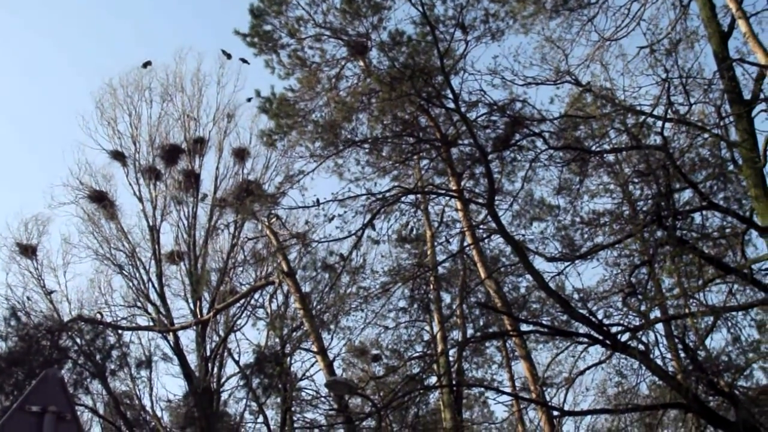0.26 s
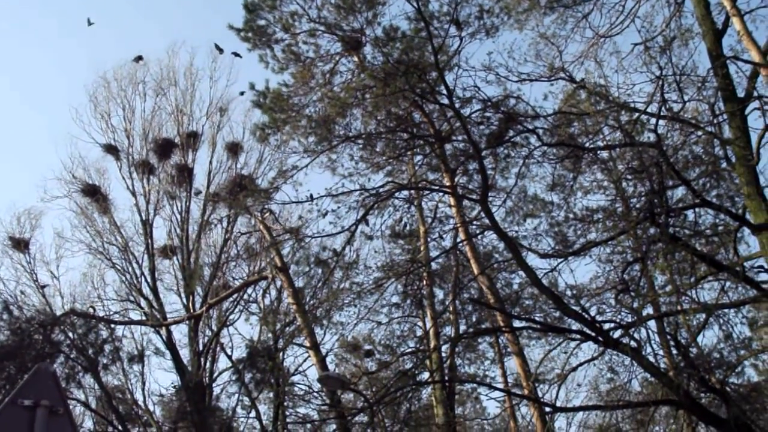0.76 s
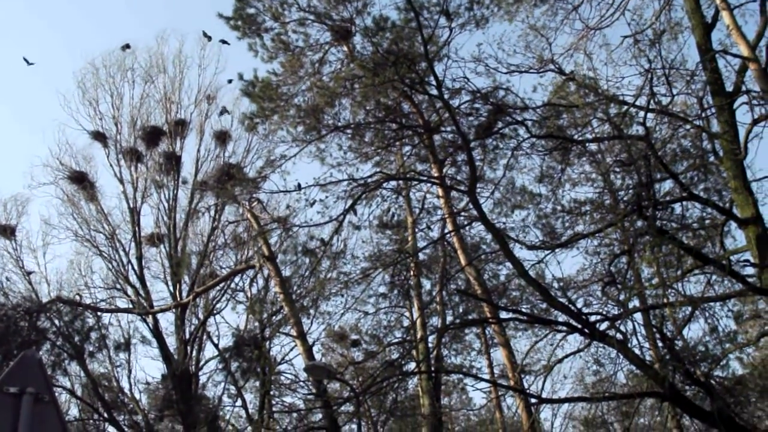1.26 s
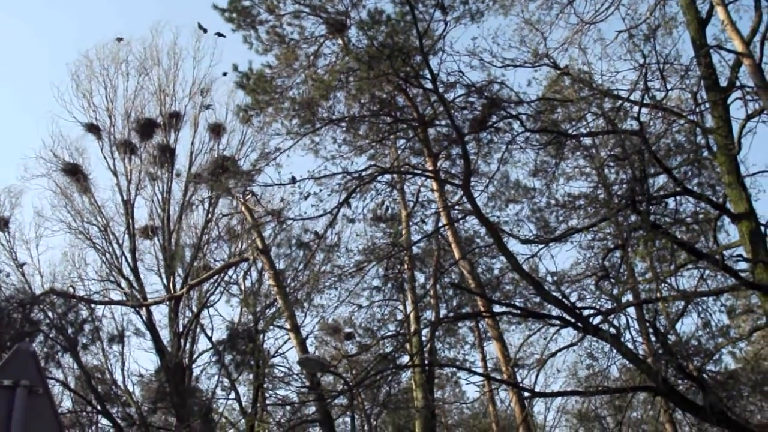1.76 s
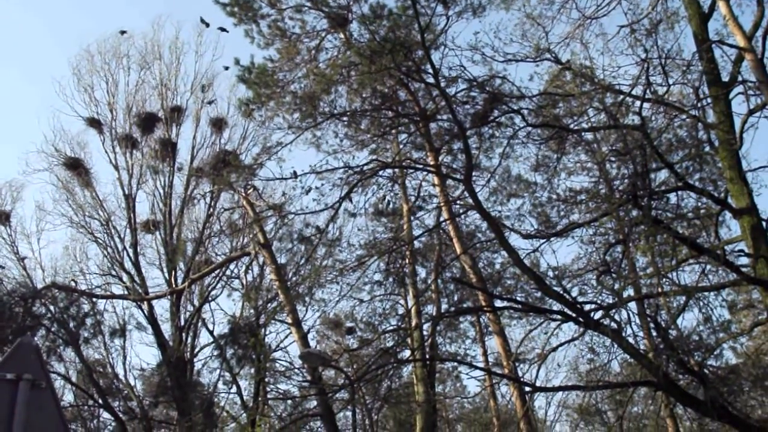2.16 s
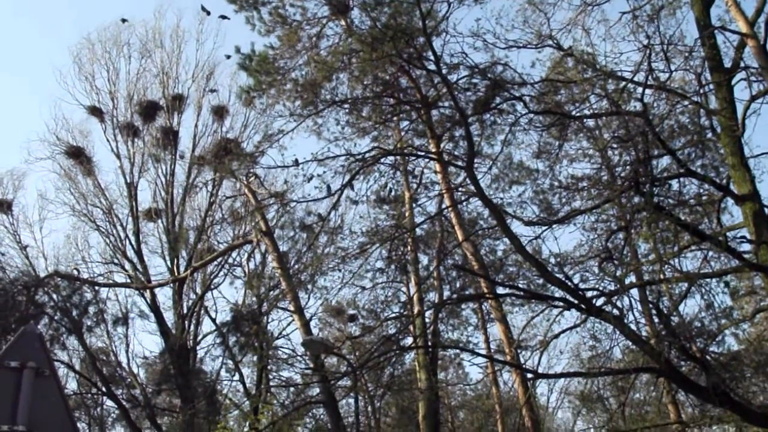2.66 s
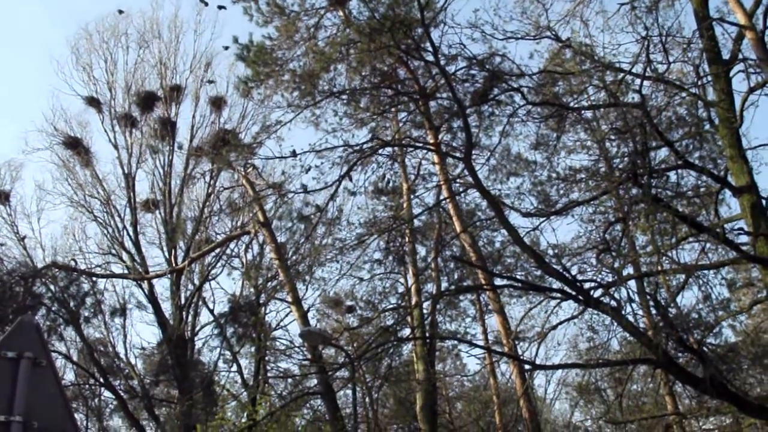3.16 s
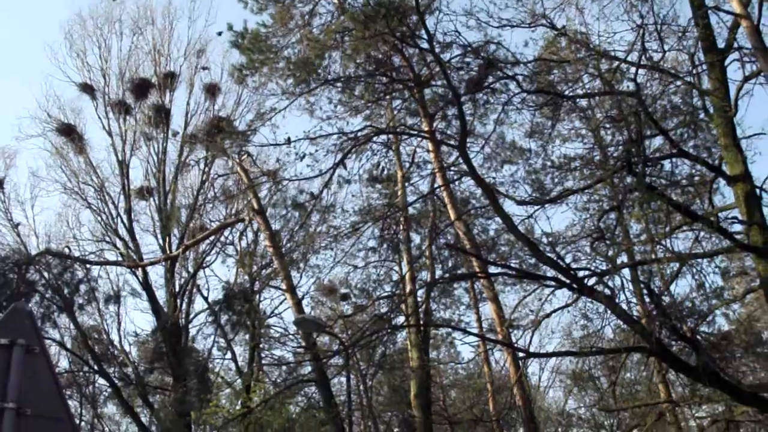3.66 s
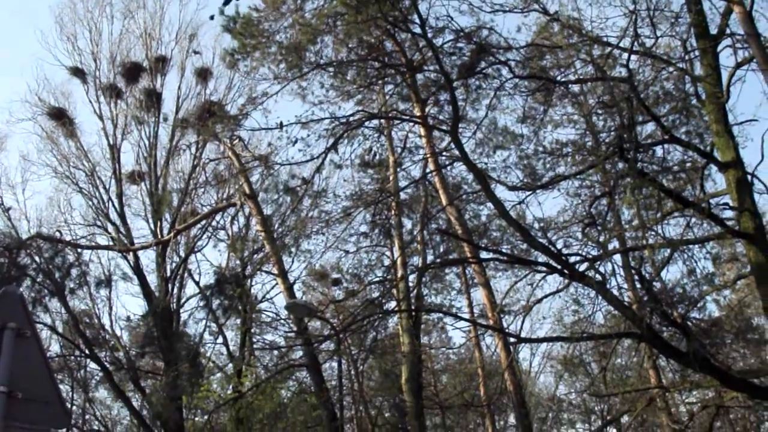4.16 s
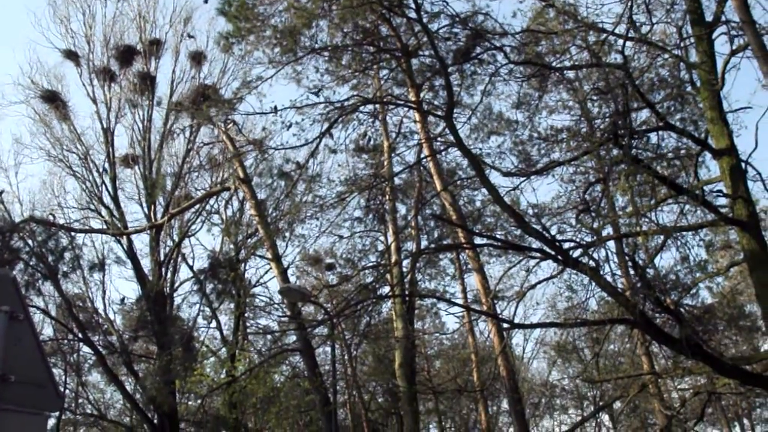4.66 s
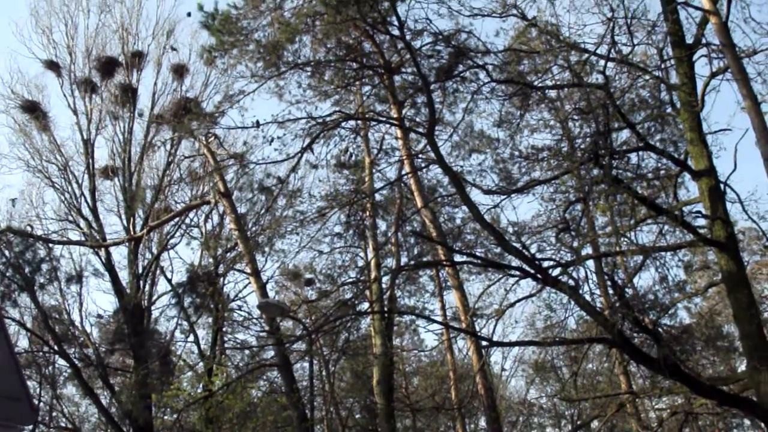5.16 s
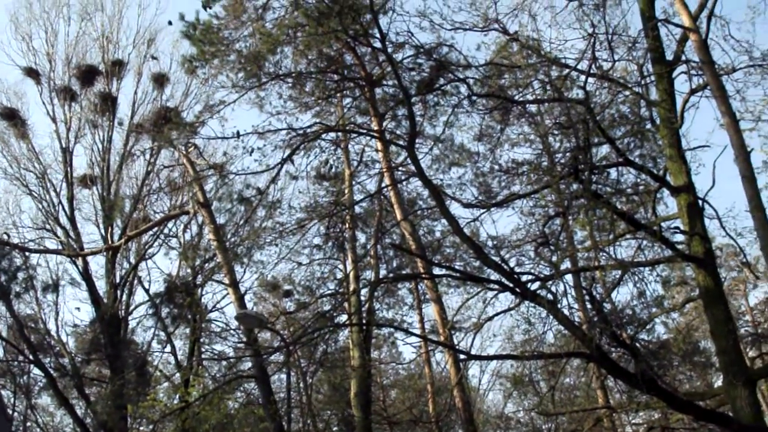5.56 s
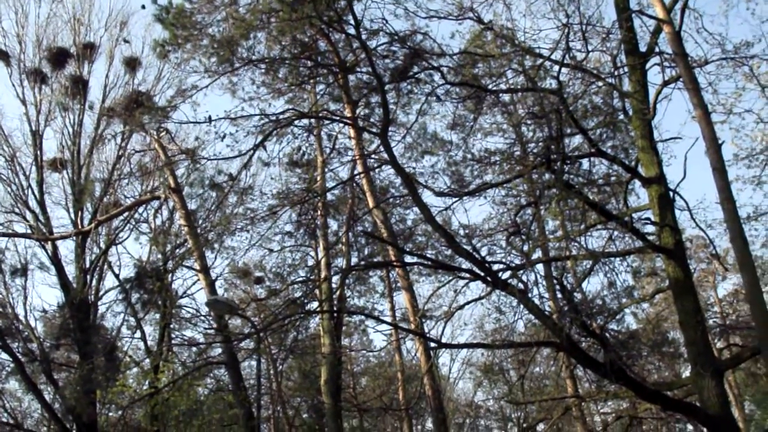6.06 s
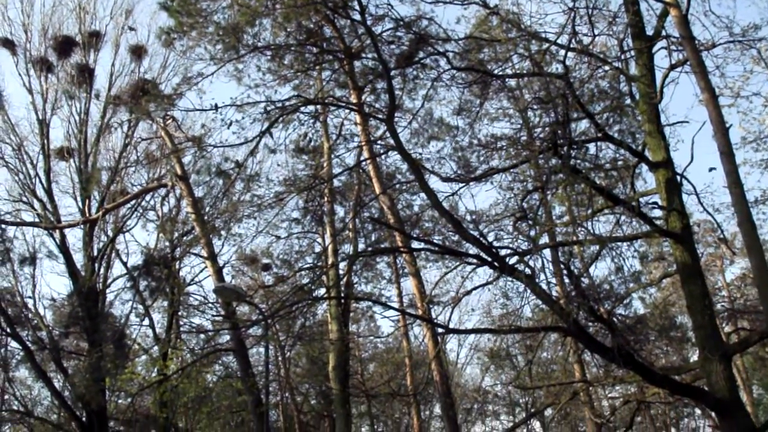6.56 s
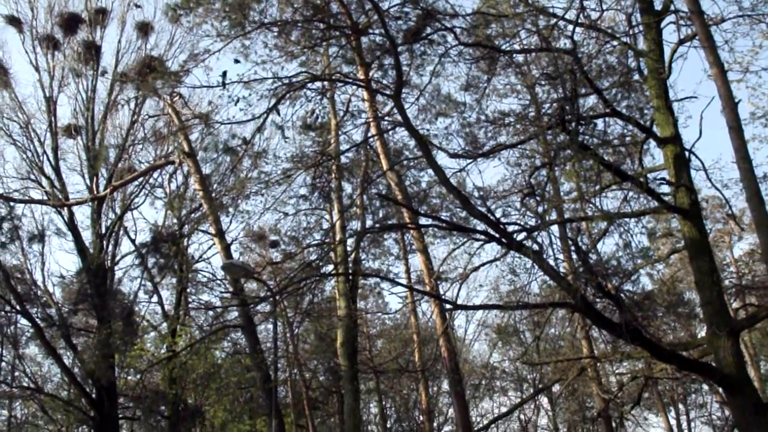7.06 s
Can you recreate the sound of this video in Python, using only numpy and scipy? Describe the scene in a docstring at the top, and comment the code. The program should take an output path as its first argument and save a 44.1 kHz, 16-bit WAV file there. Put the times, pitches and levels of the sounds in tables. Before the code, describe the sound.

Outdoors in a wood, a continuous crowd of rooks calls from treetop nests. Rough nearer caws open the scene, then high yelps come at regular intervals around the middle, joined by long nasal calls turning hoarse, and return near the end with a burst of close caws. Deep wind buffets the microphone early, eases in the middle and comes back lightly. Soft woodland hush, camera hiss and thin high whine lie underneath.

```python
"""Dozens of rooks caw over each other in the treetops of a wood; a few nearer ones stand out, a few calls
ring clear, and one bird repeats a short high yelp. Each call is a pulse train through throat and beak
resonances, scattered by trunks. Wind buffets the microphone of a small camera as shaped noise in gusts;
faint high lisps and the hush of the wood are filtered noise. The camera adds hiss and a thin whine."""
import sys
import numpy as np
from scipy import signal
from scipy.fft import rfft, irfft, next_fast_len
from scipy.io import wavfile
from scipy.ndimage import uniform_filter1d, minimum_filter1d

SR = 44100
rng = np.random.default_rng(int(sys.argv[2]) if len(sys.argv) > 2 else 0)


def to_wav(s):
    """Save 16-bit WAV."""
    ch = np.atleast_2d(s).T  # columns
    pcm = np.round(np.clip(ch, -1, 1) * 32767)  # PCM
    wavfile.write(sys.argv[1], SR, pcm.astype(np.int16))


N = 322812
T = np.arange(N) / SR
TOP_HZ = 11050  # upper band limit of pulses and camera
WHOLE_S = N / SR

# Resonances of a caw, the last one from the open beak. Each row: centre in Hz, width in Hz, gain in dB.
THROAT = [(354, 410, -10), (1303, 293, 4), (1680, 656, 2.5), (2920, 425, 7)]
# Overtones above the beak resonance: centre in Hz, width in Hz, gain in dB.
RASP = (6740, 1400, -27.5)


def colony(count=60):
    """Far rooks call in loose succession, each with its own pitch and throat size; beak level varies apart."""
    # Whole colony. Each row: time in s, throat level in dB before trim, beak against throat in dB before trim.
    colony_levels = [(0, -20, 1.5), (.6, -17, 3.5), (.8, -17, -1.5), (1.55, -17.5, -2), (2.25, -17, -3.5),
                     (2.8, -19.5, -2), (3.0, -19, -4.5), (3.55, -19.5, -7), (4.15, -22.5, 5),
                     (4.38, -23, -4.5), (4.92, -28, -5.5), (5.14, -18.5, -4), (5.5, -22, -4.5),
                     (5.72, -24.5, 1.5), (5.97, -19.5, -1), (6.38, -21.5, -2.5), (7.0, -18.5, -0.5),
                     (7.32, -23, 4)]
    trim_db, beak_trim_db = -0.5, -7
    throats, beaks = np.zeros(N), np.zeros(N)
    traits = rng.uniform(-1, 1, (count, 6))
    for k, (when, span, pitch, build, near, harsh) in enumerate(traits):
        length_s = .31 + .1 * span
        hz = 230 * 2 ** (.35 * pitch)
        rough = 0.655 + 0.3376 * harsh
        call = syrinx(length_s, hz, .14, rough) * undb(3.2 * near)
        start_s = (k + when) / count * (WHOLE_S + .3) - .3
        modes = [(f * (1 + 0.0096 * build), width, db) for f, width, db in THROAT]
        for out, part in ((throats, modes[:-1]), (beaks, [modes[-1], RASP])):
            voice = gape(resonate(call, part))
            add(out, trunks(voice, t60=.7, wet_db=4), start_s)
    throat_db, beak_db = curves(colony_levels)
    mix = even(throats, 0.2) + undb(beak_db + beak_trim_db) * even(beaks, 0.12)
    return undb(throat_db + trim_db) * mix


def near_rooks():
    """Harsh caws from the closest nests; a wider beak lifts the upper resonances."""
    # Each row: start in s, length in s, pitch at crest in Hz (before gape and shake),
    # level in dB before echoes and colour, beak lift in dB, roughness 0-1.
    caws = [(-.08, 0.33, 199.2, -23, 30, 0.99), (0.101, 0.37, 221, -25, 14, 0.67),
            (0.381, .25, 256, -16.5, 10, 0.76), (0.541, 0.19, 245, -20.5, -5, 0.85),
            (1.241, 0.22, 251, -17, 7, 0.74), (1.463, 0.34, 200, -26, 16, 0.49),
            (1.951, 0.41, 201.4, -24.5, -9.5, 0.78), (2.104, .19, 263.5, -19, 9, 0.91),
            (2.902, 0.35, 216.9, -22, -10.5, 0.35), (2.913, 0.18, 271, -21.5, 18, 0.76),
            (3.943, 0.4, 218.2, -22, -7, 0.34), (4.056, 0.2, 260.7, -24, 21, 0.75),
            (5.511, 0.18, 213, -29.5, -30, 0.19), (5.771, 0.25, 245.3, -25, -11, 0.72),
            (6.623, 0.29, 231.2, -23.5, 24, 0.83), (6.928, 0.27, 266.8, -18, 25, 0.7),
            (7.088, 0.24, 246.3, -18.5, 27, 0.77)]
    out = np.zeros(N)
    for start_s, length_s, hz, db, beak_db, rough in caws:
        lifts_db = (0, 0, 1.33 * (beak_db - 4), beak_db, beak_db)
        modes = [(f, width, gain + lift) for (f, width, gain), lift in zip(THROAT + [RASP], lifts_db)]
        pulses = syrinx(length_s, hz, .14, rough, crest=.3, attack=0.019, release=0.098)
        call = level(gape(resonate(pulses, modes), share=.07), db)
        add(out, trunks(call, t60=.45, wet_db=5), start_s)
    return out


def clear_calls():
    """Long nasal calls whose single overtones ring out; they turn hoarse towards the end."""
    # Each row: start in s, length in s, pitch at crest in Hz (before shake), level in dB before echoes
    # and colour, pitch arch share, weakening of every second pulse 0-1, resonance scale.
    clear = [(0.117, 0.26, 443.6, -21, 0.039, 0.6, 0.98), (3.678, 0.43, 461, -17.5, 0.1, 0.4, 1.085),
             (3.95, 0.3, 426, -25.5, 0.26, 0.4, 0.6), (4.425, .43, 455, -24.5, 0.16, 0.72, 1.12),
             (5.503, 0.61, 416, -33, .04, 0, 1.45)]
    # Resonances before scaling. Each row: centre in Hz, width in Hz, gain in dB.
    clear_throat = [(1350, 320, -5), (2090, 530, 25.5), (2780, 520, -8.5), (6800, 1400, -24)]
    out = np.zeros(N)
    for start_s, length_s, hz, db, arch, weak, scale in clear:
        shape = dict(crest=.34, attack=.05, release=.04)
        pure = syrinx(length_s, hz, arch, .07, weak, **shape)
        hoarse = syrinx(length_s, hz, arch, .4, weak, **shape)
        share = np.linspace(.2, .75, len(pure)) ** 2  # power share of the hoarse voice
        voice = np.sqrt(1 - share) * pure + np.sqrt(share) * hoarse
        modes = [(f * scale, width, gain) for f, width, gain in clear_throat]
        call = level(resonate(voice, modes), db)
        add(out, trunks(call, t60=.4, wet_db=-5.5), start_s)
    return out


def yelps():
    """A high, cracked voice leaps up and down; its fourth harmonic sweeps through the beak resonance twice."""
    # All of one shape. Each row: start in s, level in dB before echoes and colour.
    yelp_times = [(2.409, -27), (2.81, -24.5), (3.211, -24), (3.621, -23.5), (4.07, -24), (6.53, -23.5),
                  (6.924, -26.5)]
    # Each row: centre in Hz, width in Hz, gain in dB.
    yelp_throat = [(1750, 800, 2.5), (2770, 400, -31), (3250, 250, 13.5)]
    length_s, hz, arch, rough = .188, 936.5, .19, 0.463
    out = np.zeros(N)
    for start_s, db in yelp_times:
        pulses = syrinx(length_s, hz, arch, rough, crest=.5, attack=.025, release=.015)
        call = level(resonate(pulses, yelp_throat), db)
        add(out, trunks(call, t60=.25, wet_db=-4), start_s)
    return out


def syrinx(length, hz, arch, rough, weak=0, crest=.4, attack=0.038, release=0.046):
    """One call as a pulse train: pitch rises and sags; roughness shakes the cycles and adds gated air."""
    size = int(length * SR)
    t = np.arange(size) / SR
    wander = walk(SR, 44.71)[:size]
    shake = walk(SR, 350)[:size]
    rattle = walk(SR, 107.7)[:size]
    air = rng.standard_normal(SR)[:size]
    u = t / length
    bend = np.where(u < crest, (crest - u) / crest, (u - crest) / (1 - crest)) ** 2
    jitter = 0.00297 * wander + rough * (0.02062 * wander + 0.05925 * shake)
    pitch_hz = hz * (1 - arch * bend) * (1 + jitter)
    phase = np.pi * np.cumsum(pitch_hz) / SR  # half a turn per pulse
    harmonics = int(TOP_HZ / hz)
    pulses = level(np.sin((2 * harmonics + 1) * phase) / (np.sin(phase) + 1e-12) - 1, 0)
    pulses = pulses * (1 - weak * np.sin(phase / 2) ** 2)  # strong and weak pulses alternate
    puffs = level(air * np.cos(phase) ** 4, 0)
    voice = (pulses + 1.25 * rough * puffs) * undb(3.4 * rough * rattle)
    return voice * np.clip(t / attack, 0, 1) * np.clip((length - t) / release, 0, 1)


def gape(call, share=.1):
    """The beak opens and closes during a caw: resonances and pitch rise and sag together."""
    u = np.linspace(-1, 1, len(call))
    speed = 1 - share * (u ** 2 - np.mean(u ** 2))
    return np.interp(np.cumsum(speed), np.arange(len(call)), call)


def trunks(x, t60, wet_db):
    """Direct sound plus its echoes, scaled to keep the power about the same."""
    wet = undb(wet_db) * echoes(x, t60)
    direct = np.pad(x, (0, len(wet) - len(x)))
    return (direct + wet) / np.sqrt(1 + undb(wet_db) ** 2)


def echoes(x, t60):
    """Many small decaying reflections from trunks and branches, drawn anew per call, of unit total energy."""
    t = np.arange(SR // 2) / SR
    chance = rng.standard_normal(len(t))
    decay = np.exp(-np.log(1000) * t / t60)
    response = chance * np.abs(chance) * decay * np.clip(t / 0.0017, 0, 1)
    return signal.fftconvolve(x, response / np.sqrt(np.sum(response ** 2)))


def wind():
    """Small eddies buffet the microphone in gusts; large ones swell and sink more gradually under them."""
    # Small eddies. Each row: frequency in Hz, relative density in dB per Hz.
    wind_colour = [(25, -12.5), (48, 3), (80, -4.5), (120, -14), (180, -23.5), (300, -38.5), (700, -75)]
    # Slow pressure swings. Each row: frequency in Hz, relative density in dB per Hz.
    sway_colour = [(8, 0), (24, 9.5), (42, 5.5), (60, -11), (120, -62.5)]
    sway_db, sway_smooth_s = -0.5, 0.2
    force_db = wind_force()
    smooth_db = uniform_filter1d(force_db, int(sway_smooth_s * SR)) + sway_db
    eddies = even(colour(rng.standard_normal(N), wind_colour), 0.0616) * undb(force_db)
    sway = even(colour(rng.standard_normal(N), sway_colour), 0.26) * undb(smooth_db)
    return eddies + sway


def wind_force():
    """Level of the wind in dB: each gust rises quickly, holds and dies away on top of the breeze."""
    # Breeze between gusts. Each row: time in s, level in dB before trim.
    breeze = [(0.0, -28), (0.41, -28.5), (1.12, -19), (1.65, -21), (2.53, -29.5), (4.36, -36.5),
              (5.02, -26.5), (6.48, -28), (6.71, -26.5), (7.32, -24.5)]
    # Gusts that hit the microphone. Each row: start in s, time to the decay in s, level in dB.
    gusts = [(-.01, 0.036, -16), (0.11, 0.094, -14), (0.495, 0.081, -20), (0.767, 0.11, -14),
             (1.074, 0.12, -11), (1.213, 0.073, -13), (1.386, 0.045, -8), (1.579, 0.21, -17.5),
             (2.05, 0.11, -14.5), (2.941, 0.027, -19), (4.508, 0.066, -23), (5.083, 0.058, -13),
             (5.448, 0.051, -19), (5.768, 0.053, -20), (5.952, 0.023, -20), (6.13, 0.066, -19.5),
             (6.523, 0.061, -18), (6.656, 0.28, -23.5), (7.227, .05, -20)]
    breeze_trim_db, attack_s, decay_s = -1.5, 0.03, 0.021
    breeze_db, = curves(breeze)
    power = undb(breeze_db + breeze_trim_db) ** 2
    for start_s, length_s, db in gusts:
        rise = np.clip((T - start_s) / attack_s, 0, 1)
        fall = np.exp(-np.clip((T - start_s - length_s) / decay_s, 0, 20))
        power = power + (undb(db) * rise * fall) ** 2
    return 10 * np.log10(power)


def lisps():
    """Faint short swells of narrow, very high noise among the branches."""
    # Each row: start in s, length in s, centre in Hz, level in dB.
    lisp_rows = [(2.456, .16, 8260, -46), (2.8, 0.44, 8700, -51), (4.064, .28, 9000, -52),
                 (5.05, 0.23, 7500, -44), (6.048, 0.3, 7400, -43.5)]
    out = np.zeros(N)
    for start_s, length_s, hz, db in lisp_rows:
        size = int(length_s * SR)
        hiss = resonate(rng.standard_normal(SR)[:size], [(hz, 1100, 0)])
        add(out, level(hiss * np.sqrt(np.hanning(size)), db), start_s)
    return out


def wood_hush():
    """The still wood as steady coloured noise."""
    # Each row: frequency in Hz, relative density in dB per Hz.
    wood = [(60, 13), (140, 0.5), (230, -5), (340, 5.5), (450, -6.5), (700, 4), (1500, -12), (4000, -11),
            (9000, -25)]
    return level(colour(rng.standard_normal(N), wood), -37)


def camera_noise():
    """Each channel hisses on its own; a thin whine with a narrow noisy skirt is common to both."""
    # Each row: frequency in Hz, relative density in dB per Hz.
    hiss_colour = [(800, -37), (3000, -11), (5000, -42), (6200, -8.5), (7200, 15), (8200, 6), (9500, 4.5),
                   (11000, -4.5)]
    whine_hz, whine_db = 7445, -48.5
    hiss = np.array([level(colour(rng.standard_normal(N), hiss_colour), -42) for _ in range(2)])
    whine = np.sin(2 * np.pi * np.cumsum(whine_hz + 6 * walk(N, 40)) / SR)
    skirt = resonate(rng.standard_normal(N), [(whine_hz + 20, 130, 0)])
    return hiss + level(whine, whine_db) + level(skirt, whine_db - 1)


def undb(db):
    """Decibels to gain."""
    return 10 ** (np.asarray(db) / 20)


def level(x, db):
    """Set the rms level."""
    return x * undb(db) / np.sqrt(np.mean(x ** 2) + 1e-18)


def curves(table):
    """The columns of a timed table at every sample."""
    s, *columns = np.transpose(table)
    return [np.interp(T, s, c) for c in columns]


def walk(size, rate):
    """Random wander of spread near 1: straight lines between normal draws, rate per second."""
    at = np.arange(size) * rate / SR
    knots = rng.standard_normal(size // 16 + 3)
    return np.interp(at, np.arange(len(knots)), knots)


def colour(x, points):
    """Filter by a (Hz, dB) spectrum."""
    hz, db = np.transpose(points)
    size = next_fast_len(len(x))
    f = np.arange(size // 2 + 1) * SR / size
    gain = undb(np.interp(np.log(f + 1), np.log(hz), db))
    return irfft(rfft(x, size) * gain, size)[:len(x)]


def resonate(x, modes):
    """Pass through side-by-side resonances with steep skirts; their powers add."""
    size = next_fast_len(len(x))
    f = np.arange(size // 2 + 1) * SR / size
    power = sum((undb(db) / (1 + ((f - hz) / width * 2 ** .5) ** 2)) ** 2 for hz, width, db in modes)
    return irfft(rfft(x, size) * np.sqrt(power), size)[:len(x)]


def even(x, seconds):
    """Take out swells slower than the given time, to rms near 1."""
    return x / np.sqrt(uniform_filter1d(x ** 2, int(seconds * SR)) + 1e-9)


def add(out, x, start):
    """Mix a call in at its start time."""
    i = int(start * SR)
    lo, hi = max(i, 0), min(i + len(x), N)
    if hi > lo:
        out[lo:hi] += x[lo - i:hi - i]


def scene():
    """Birds, wind and the hush of the wood reach both channels alike; the hiss differs."""
    # Microphone colour on the calls. Each row: frequency in Hz, gain in dB.
    mic = [(200, -16), (700, -1.5), (2400, 1.5), (3300, 2.5), (3650, -2), (4100, -5.5), (5000, -8.5),
           (6200, 8.5), (7300, 10), (10000, -5)]
    birds = colour(colony() + near_rooks() + clear_calls() + yelps(), mic)
    return birds + lisps() + wood_hush() + wind() + camera_noise()


def record(dry):
    """The camera limits the highest peaks and cuts the top."""
    need = np.minimum(1, .95 / (np.abs(dry).max(axis=0) + 1e-9))
    gain = uniform_filter1d(minimum_filter1d(need, size=256), size=256)
    low_pass = signal.ellip(12, .2, 85, TOP_HZ, fs=SR, output="sos")
    return signal.sosfilt(low_pass, dry * gain)


dry = scene()
out = record(dry)
to_wav(out)
```